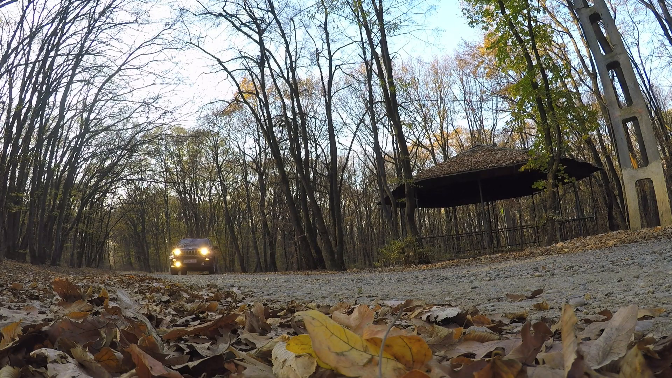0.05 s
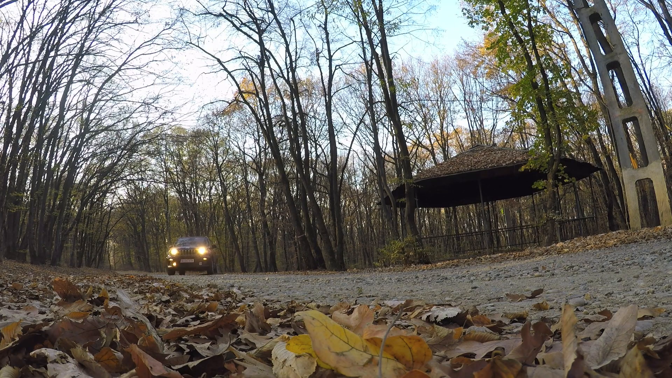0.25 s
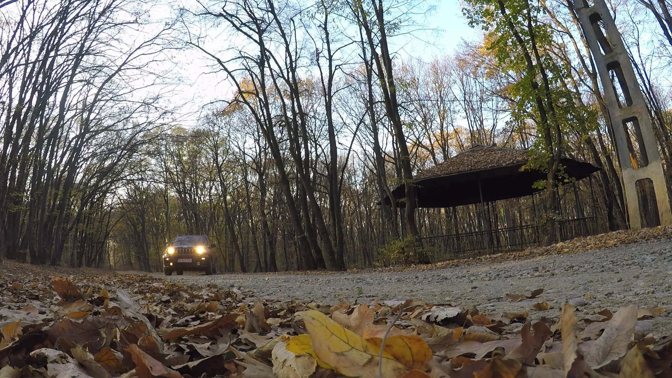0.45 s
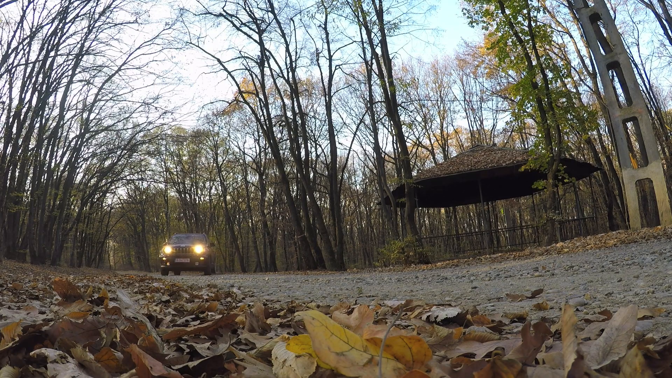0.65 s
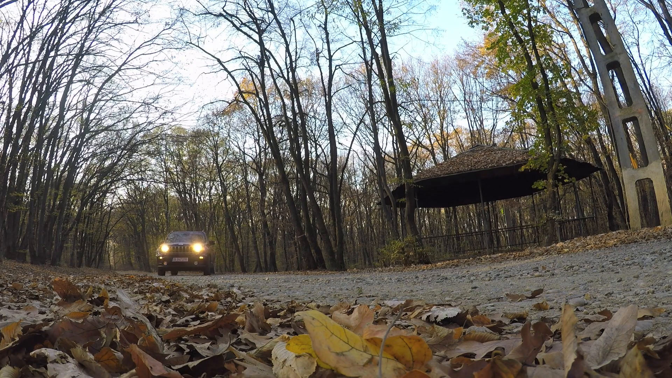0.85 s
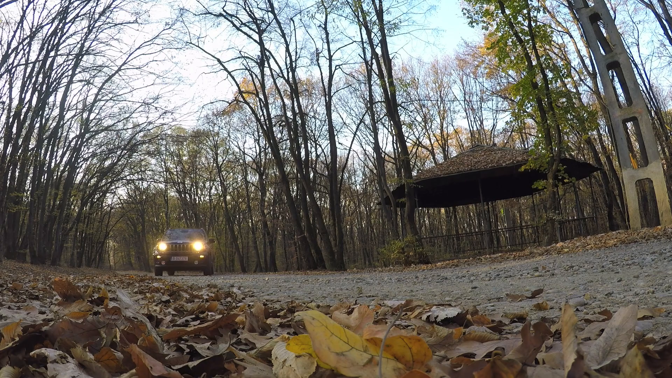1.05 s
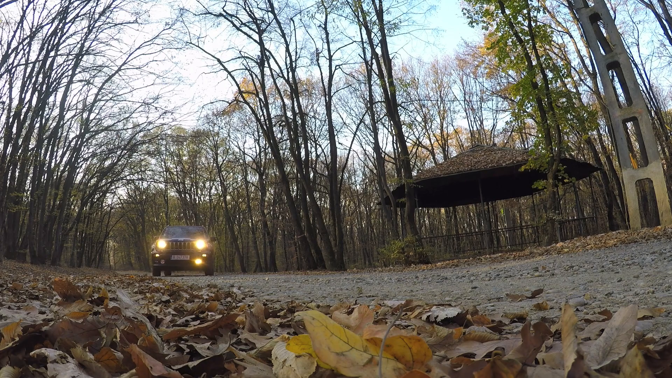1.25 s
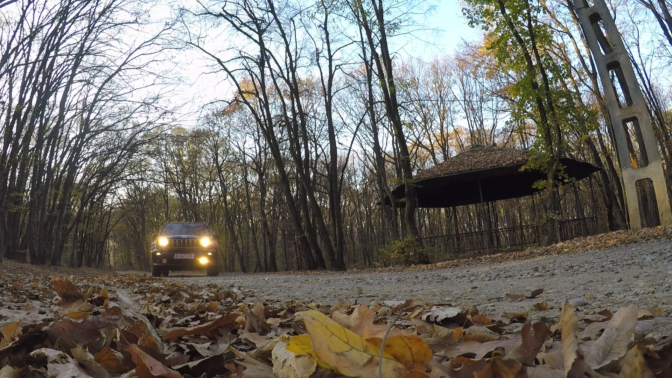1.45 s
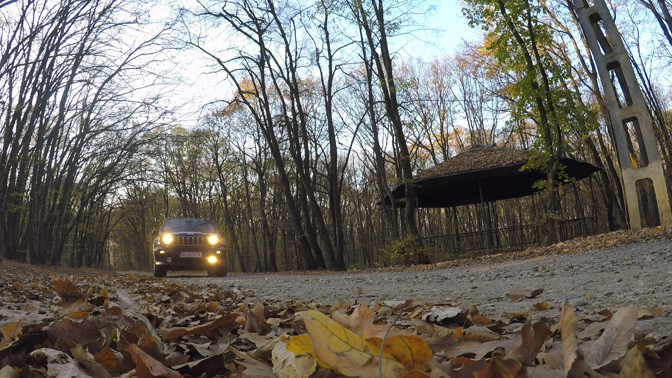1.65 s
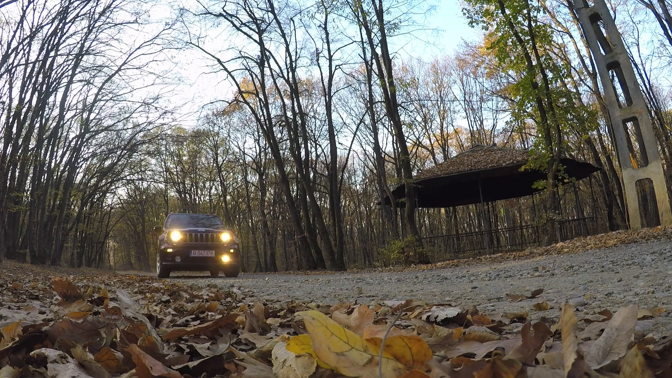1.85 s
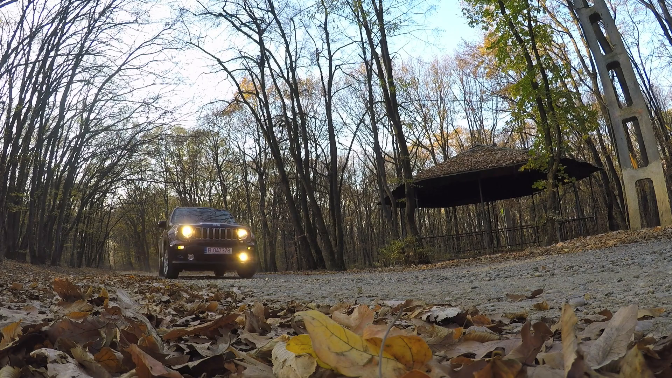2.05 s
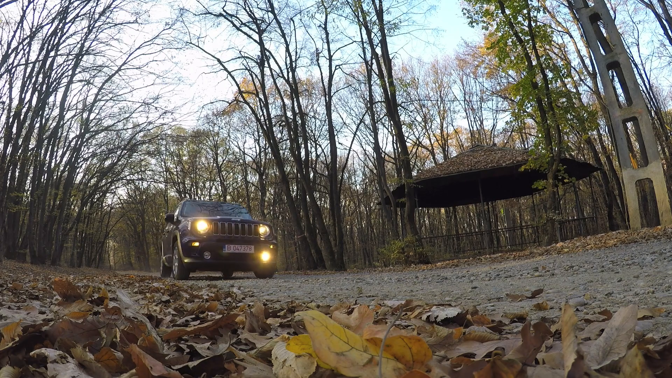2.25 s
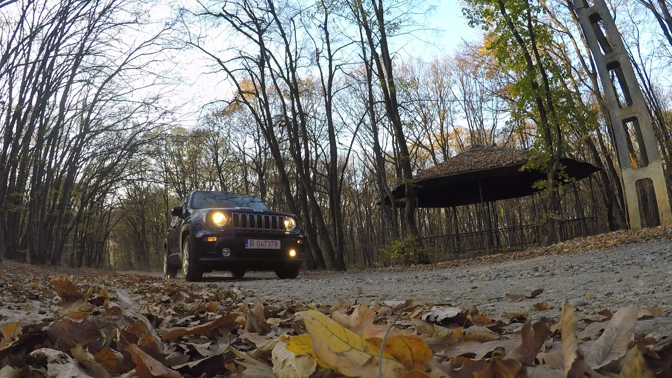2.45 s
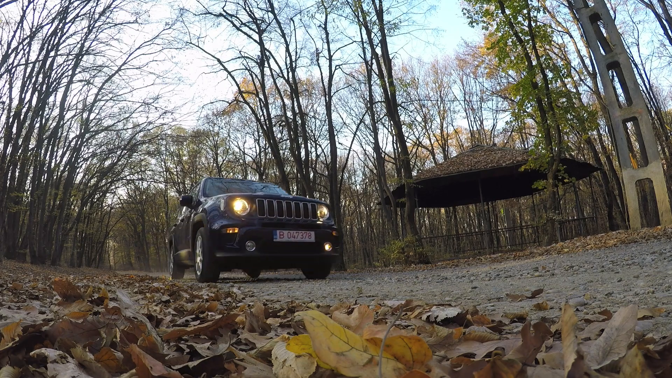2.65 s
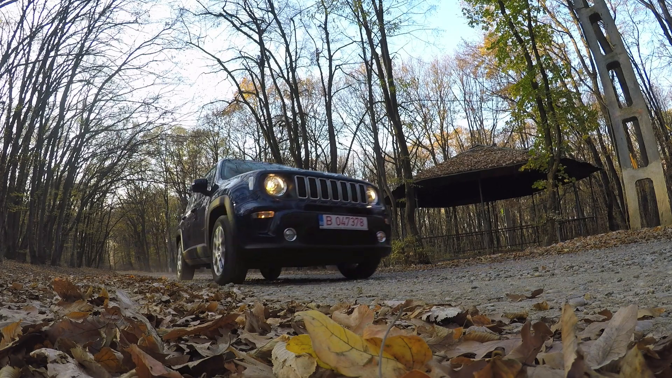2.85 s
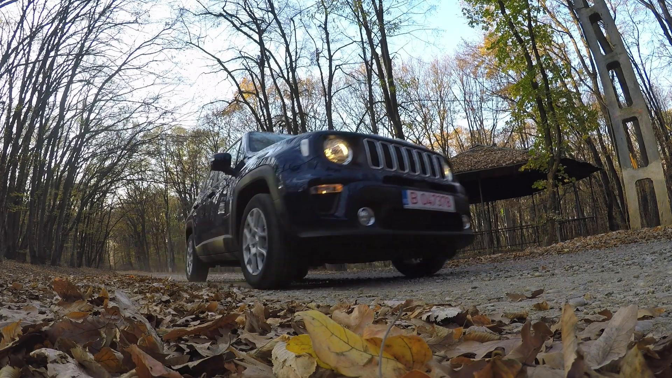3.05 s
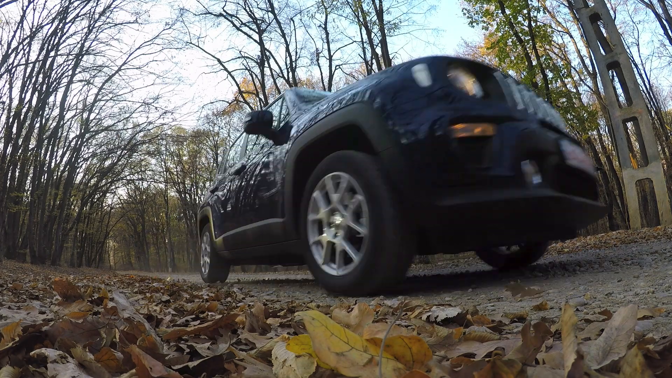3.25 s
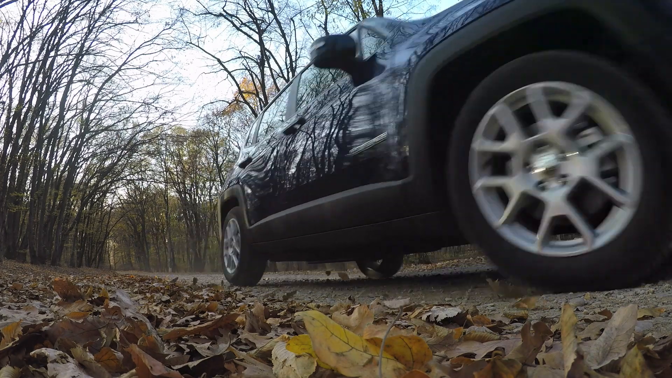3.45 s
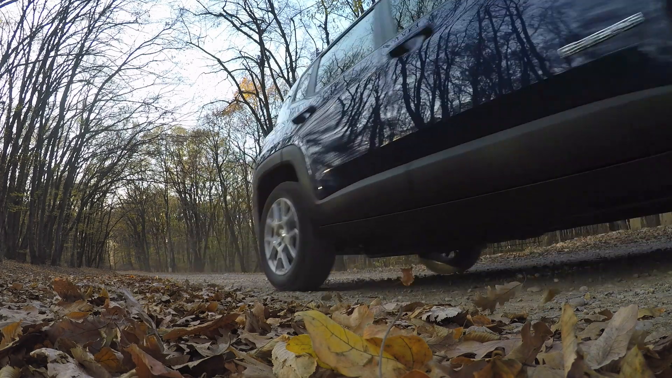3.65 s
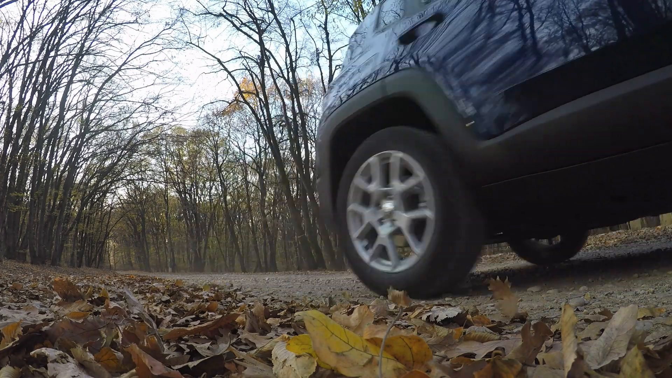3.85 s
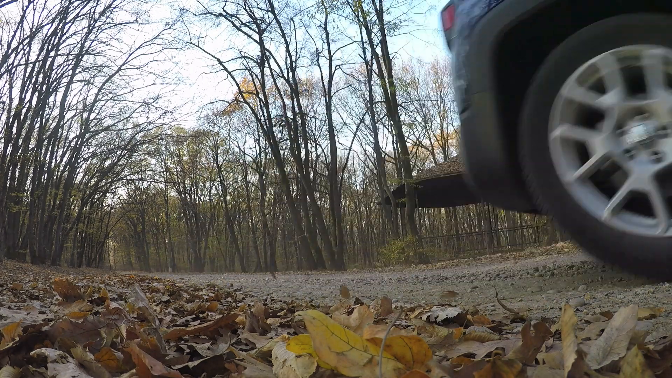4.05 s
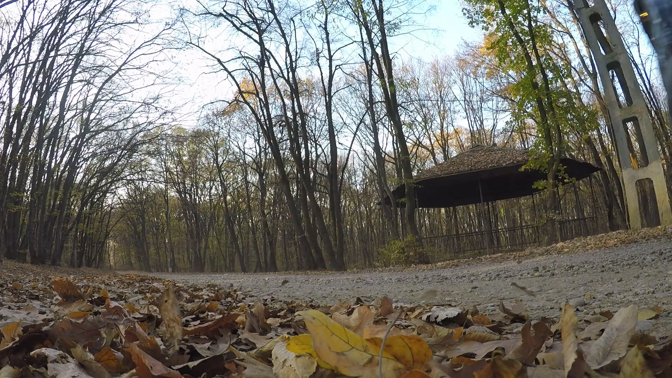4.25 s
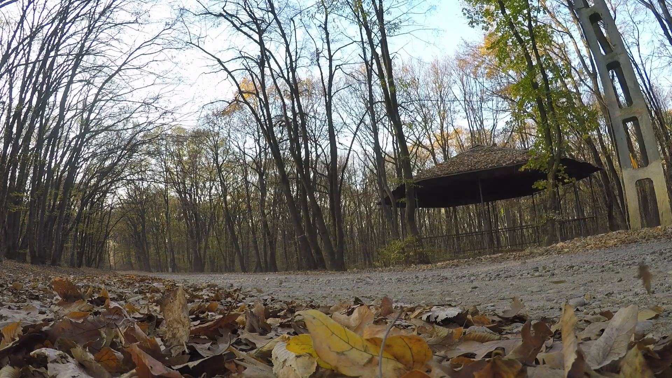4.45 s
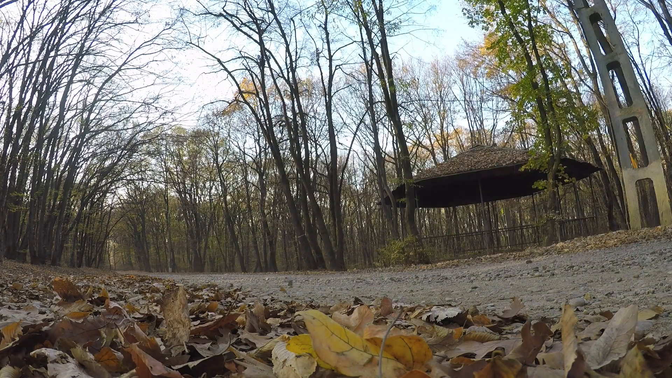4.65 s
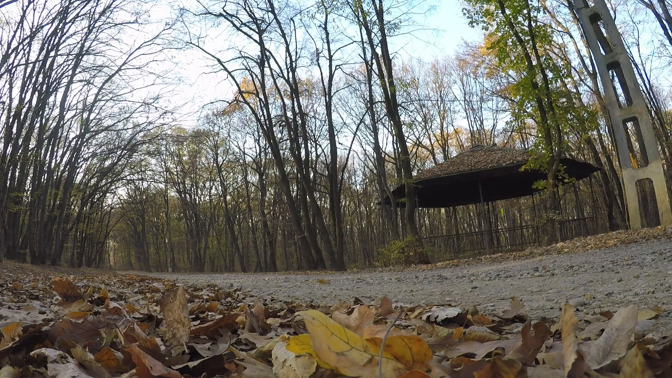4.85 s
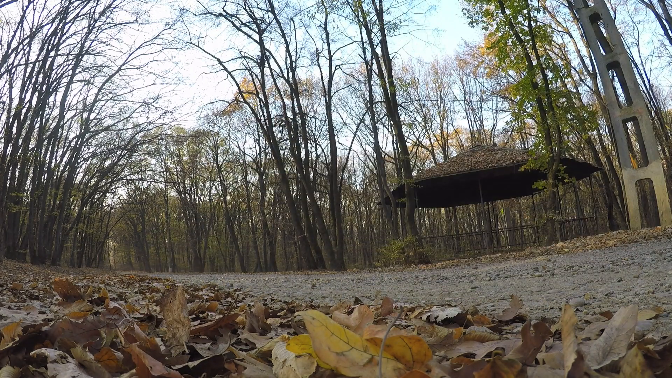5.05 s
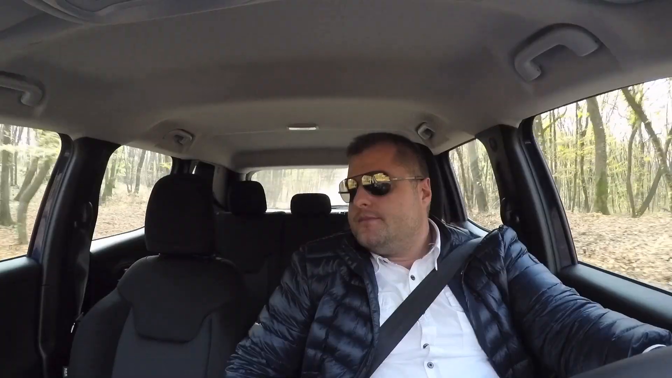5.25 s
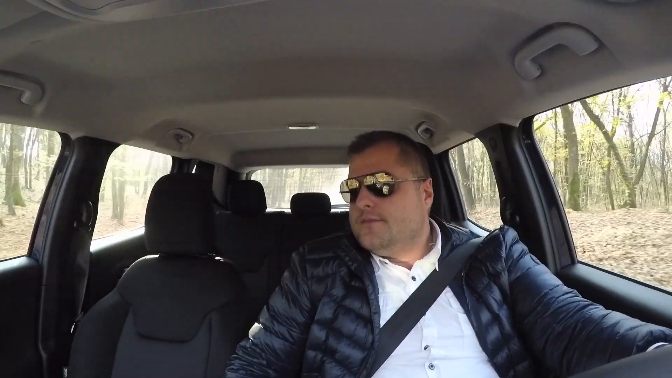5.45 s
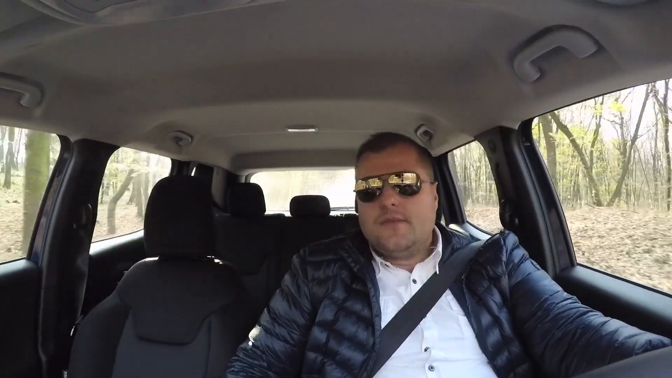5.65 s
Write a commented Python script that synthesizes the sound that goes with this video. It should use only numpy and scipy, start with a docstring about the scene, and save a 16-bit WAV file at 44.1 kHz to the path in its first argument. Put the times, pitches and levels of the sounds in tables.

```python
"""Car passing on gravel

A petrol car rolls up a gravel forest road past a small housed camera lying in leaves. Filtered noise and
random stone slips, attenuated with distance, make the tyres; decaying modes and noise bursts make the
popping stones, thuds and crunches; a gliding harmonic tone makes the exhaust note, sinking as it leaves.
The sound then fades out and returns inside the moving car: body boom, road hum, trim hiss and ticks."""
import sys
import numpy as np
from scipy import signal
from scipy.fft import rfft, irfft
from scipy.io import wavfile
from scipy.ndimage import uniform_filter1d, minimum_filter1d

SR = 44100
rng = np.random.default_rng(int(sys.argv[2]) if len(sys.argv) > 2 else 0)


def wav_out(sig):
    """Save sig, one row per channel (or a flat mono array), as 16-bit PCM at SR to the path in sys.argv[1]."""
    wavfile.write(sys.argv[1], SR, np.round(np.clip(np.atleast_2d(sig).T, -1, 1) * 32767).astype(np.int16))


N = 251811
T = np.arange(N) / SR
ABEAM_S = (3.2, 3.81)  # the view turns from the car's front to its rear
SPEED_M_S, CLOSEST_M, CLOSEST_S = 3.34, 2.146, 3.413  # straight pass: speed, least distance and its time


def undb(db):
    """Amplitude ratio: 20 dB is a factor of ten."""
    return 10 ** (np.asarray(db) / 20)


def unit(x):
    """Normalisation to an rms of 1."""
    return x / np.sqrt(np.mean(x ** 2))


def noise():
    """White noise: equal mean power at every frequency."""
    return rng.standard_normal(N)


def butter(x, order, hz, kind="low"):
    """Butterworth filtering: a maximally flat passband."""
    return signal.sosfilt(signal.butter(order, hz, kind, fs=SR, output="sos"), x)


def colour(x, shape):
    """Minimum-phase filtering to a (Hz, dB) spectrum by the folded cepstrum; rms 1 out."""
    size = 16384
    hz, db = np.transpose(shape)
    f = np.arange(size // 2 + 1) * SR / size + 1e-3
    # octaves beyond the ends of the shape, where the gain falls by a further 40 dB each
    outside = np.maximum(np.log2(hz[0] / f), 0) + np.maximum(np.log2(f / hz[-1]), 0)
    gain_db = np.interp(np.log(f), np.log(hz), db) - 40 * outside
    cepstrum = irfft(np.log(undb(np.maximum(gain_db, -110))))
    cepstrum[1:size // 2] *= 2
    cepstrum[size // 2 + 1:] = 0
    impulse = irfft(np.exp(rfft(cepstrum)))
    return unit(signal.fftconvolve(x, impulse)[:N])


def walk(rate):
    """Slow random modulation: levels held 1 / rate s, slewed twice, with rms 1."""
    hold = int(SR / rate)
    steps = np.repeat(rng.standard_normal(N // hold + 1), hold)
    return unit(uniform_filter1d(uniform_filter1d(steps, hold), hold)[:N])


def ring(seconds, level_db, hz, t60, rise_s, q=0):
    """Exponential decay of struck bodies: a clean mode, or with q a burst of band noise around it."""
    out = np.zeros(N + SR)
    t = np.arange(SR // 8) / SR
    rise = np.sin(np.pi / 2 * np.minimum(t / rise_s, 1)) ** 2
    for s, db, f, decay_s in np.broadcast(seconds, level_db, hz, np.clip(t60, .002, .15)):
        wave = np.sin(2 * np.pi * f * t)
        if q:
            band = signal.iirpeak(f, q, SR)
            once = signal.lfilter(*band, rng.standard_normal(len(t)))
            wave = unit(signal.lfilter(*band, once)) / 2
        i = int(s * SR)
        decay = np.exp(-np.log(1000) * t / decay_s)
        out[i:i + len(t)] += undb(db) * wave * decay * rise
    return out[:N]


def stones(per_s, spread_db, bed_db, looseness):
    """Random impulse process: stones slip with a long tail of sizes, over a bed of tiny slips."""
    chance = rng.random((N, 2)).T
    size_db = np.minimum(-spread_db * np.log(1 - chance[1]), 13)
    sizes = undb(size_db) * rng.choice([-1, 1], N)
    clicks = unit((chance[0] < per_s / SR) * sizes)
    return (clicks + undb(bed_db) * noise()) * looseness


def heard(abeam_db, coming_db, leaving_db, floor_db):
    """Attenuation with distance, down to what the forest scatters back; gives a layer's gain."""
    doublings = np.log2(np.hypot(SPEED_M_S * (T - CLOSEST_S), CLOSEST_M) / CLOSEST_M)
    loss_db = doublings * np.where(T < CLOSEST_S, coming_db, leaving_db)
    return np.hypot(undb(abeam_db - loss_db), undb(floor_db))


# Tyre thudding and roar, from the front and from behind. Each row: frequency in Hz, relative density in dB.
ROAR_FRONT = [(59, -36.5), (100, 1.5), (184, -1.5), (216, -4), (355, -9), (435, -7), (548, -23.5),
              (600, -11), (780, -30)]
ROAR_REAR = [(59, -29.5), (100, 3), (210, -8.5), (232, -9), (279, -6.5), (388, -22.5), (600, -13),
             (780, -29)]


def tyre_roar(patch, behind):
    """Broadband excitation by bumps, plus the cavity resonance of the air ring inside the tyres."""
    bumps = noise() * undb(0.65 * patch + 1.37 * walk(16))
    roar = (1 - behind) * colour(bumps, ROAR_FRONT) + behind * colour(bumps, ROAR_REAR)
    air_hz, width_hz, air_db = 210, 5.4, -7.5
    air = unit(signal.lfilter(*signal.iirpeak(air_hz, air_hz / width_hz, SR), noise()))
    return roar + undb(air_db) * air


# Stones crushed under the tread. Each row: frequency in Hz, relative density in dB.
CRUNCH = [(280, -30), (480, 2.5), (511, 1.5), (560, -15.5), (666, 7.5), (721, 3), (891, 3), (1190, -4),
          (1700, -22.5), (2210, -70.5)]


def stone_crunch(coarse, behind):
    """Spectral filtering along the path: distance takes the top, the view from behind the bottom."""
    crushed = colour(coarse, CRUNCH)
    thin = butter(crushed, 3, 552, "high")
    crushed = np.cos(np.pi / 2 * behind) * crushed + np.sin(np.pi / 2 * behind) * thin
    near = np.interp(T, (1.88, 2.05), (0, 1))
    return near * crushed + (1 - near) * butter(crushed, 4, 1460)


# Remaining tyre layers, lowest first. Each row: frequency in Hz, relative density in dB.
RUMBLE = [(7.1, -25.5), (12, -0.5), (27, 7.5), (55, -6), (72, -45)]
DRONE = [(29, -24), (50, 0.5), (86, 0), (120, -10), (160, -20.5)]
SCRAPE = [(740, -2.5), (1250, 2.5), (2810, -13.5), (3200, -18.5), (4160, -32.5)]
GRIT = [(1710, -29.5), (2900, -13), (3540, -7), (3960, -2), (4420, -3.5), (6160, -13), (7370, -19.5),
        (8580, -15), (11400, -30), (12700, -25.5), (15100, -37)]
# Distance law of rumble, drone, roar, crunch, scrape and grit. Each row: level abeam in dB,
# loss per doubling coming in dB, loss per doubling leaving in dB, far floor in dB.
DISTANCE_LAWS = [(-21.5, 4.5, 3, -53), (-18.5, 5, 11.5, -31), (-18, 4.5, 10, -40), (-21.5, 7, 15, -39.5),
                 (-30.5, 15, 13.5, -49.5), (-41, 11, 18, -62)]
# Bass and crunch start fuller and dip briefly as the car leaves. Each row: time in seconds, added level in dB.
FULLNESS = [(0, 5), (.7, 0), (1.3, 0.7), (4.86, 2), (4.96, -0.5), (5.08, 4.5), (5.25, 0.5)]


def tyres():
    """Common modulation: loose and firm patches of road move crunch, scrape and grit together."""
    rumble, drone, roar, crunch, scrape, grit = (heard(*law) for law in DISTANCE_LAWS)
    fullness = undb(np.interp(T, *np.transpose(FULLNESS)))
    behind = np.interp(T, ABEAM_S, (0, 1))
    patch = 1.33 * walk(25.11)
    # behind the car fewer stones still roll, so the patches stand further apart
    patch = patch * (1 + 0.5 * behind)
    # alongside all four wheels crunch at once, which evens them out
    patch = patch * (1 - 0.2 * np.exp(-((T - CLOSEST_S) / 0.49) ** 2))
    coarse = stones(300, 4.4, -1.5, undb(patch))
    fine = stones(2500, 3.6, 1.4, undb(0.64 * patch + 0.76 * walk(20)))
    low = rumble * colour(noise(), RUMBLE) + drone * colour(noise(), DRONE)
    middle = roar * tyre_roar(patch, behind) + crunch * stone_crunch(coarse, behind)
    high = scrape * colour(1.22 * coarse + fine, SCRAPE) + grit * colour(fine, GRIT)
    return fullness * (low + middle) + high


# Hiss level of the leaves. Each row: time in seconds, mean level in dB.
WAKE = [(0, -60.5), (2, -62), (3.5, -78), (4.3, -58.5), (4.8, -58), (5.25, -58.5)]
# Spectrum of the leaves. Each row: frequency in Hz, relative density in dB.
RUSTLE = [(3820, -2), (6500, -1.5), (7410, -4.5), (8470, -3.5), (9620, -3.5), (12000, -14.5), (15600, -40)]


def leaves():
    """Modulated high-band noise: a thin hiss, strongest in the car's wake."""
    level_db = np.interp(T, *np.transpose(WAKE)) + 1.4 * walk(16)
    return colour(noise(), RUSTLE) * undb(level_db)


# Stones popping out under the tread. Each row: start in seconds, relative level in dB,
# ring frequency in Hz, scrape level relative to the knock in dB.
POPS = [(0.39, -1, 790, -43), (0.531, -25, 800, -40), (0.553, -3.5, 750, -43), (0.599, -6.5, 770, -42),
        (0.608, -10, 825, -41), (0.619, -4, 980, -31), (0.637, -12, 890, -26), (0.726, -12, 750, -36),
        (0.903, -4.5, 815, -54), (0.958, -8.5, 800, -30), (1.521, -10, 830, -39), (1.658, -10.5, 810, -38),
        (1.856, -7.5, 855, -42), (2.052, -5.5, 860, -43), (2.081, -2.5, 850, -44), (2.13, -5, 900, -40),
        (2.27, -7.5, 944, -29), (2.333, -1.5, 880, -24.5), (2.501, 0, 870, -41), (2.602, -3.5, 890, -41),
        (2.708, -7, 880, -28), (2.758, -2, 910, -19.5), (2.889, -2.5, 845, -26), (2.94, -5, 990, -30),
        (3.012, 0.5, 920, -21), (3.225, -5.5, 1070, -31), (3.266, -5, 815, -17), (3.311, 0.5, 785, -33),
        (3.373, 1.5, 950, -13), (3.482, -4, 850, -29), (3.569, -10, 900, -11), (3.721, -4, 850, -28),
        (3.782, -11, 835, -21), (3.798, -4, 764, -11), (3.953, -3.5, 870, -15.5), (4.027, -11, 840, -11),
        (4.106, -3.5, 815, -18), (4.154, -6, 920, -11), (4.202, -9.5, 880, -10.5), (4.231, -1, 830, -32),
        (4.257, -5.5, 820, -19), (4.293, -10, 880, -16), (4.359, -14.5, 1061, -10.5), (4.31, -17, 835, -14),
        (4.405, -6.5, 879, -24), (4.482, -15, 900, -14), (4.632, -30, 1010, -22), (4.648, -10, 901, -17),
        (4.702, -6.5, 860, -18.5), (4.722, -14, 1049, -13), (4.737, -23, 910, -15),
        (4.781, -16.5, 900, -16), (4.816, -17, 1160, -20), (4.826, -10, 966, -21), (4.846, -9, 791, -28),
        (4.859, -17.5, 1024, -11.5), (4.924, -13.5, 904, -35), (4.951, -13, 905, -30),
        (4.992, -13.5, 1050, -15), (5.025, -16, 850, -24), (5.081, -9.5, 775, -31), (5.14, -15, 900, -32),
        (5.162, -11, 785, -40), (5.179, -14.5, 822, -35), (5.249, -14.5, 885, -21), (5.281, -16, 880, -22)]


def pops():
    """Impact and friction: each stone knocks dully, tumbles on briefly and scrapes its neighbours."""
    s, db, hz, scrape_db = np.transpose(POPS)
    tumble_db = db + np.interp(s, ABEAM_S, (-18, -12))  # from the front, from behind
    knock = ring(s - .0006, db + 0.5, hz, 0.011, 0.0013)
    tumble = ring(s + 0.00301, tumble_db, hz, 0.076, 0.0013, q=1.6)
    # the camera housing muffles the knock above its wall resonance
    muffled = butter(knock + tumble, 7, 1500)
    scrape = ring(s, db + scrape_db - 0.5, 1460, 0.058, 0.0024, q=1.56)
    edge = ring(s, db + scrape_db + 1, 1780, 0.011, 0.00098, q=1.0)
    return muffled + scrape + edge


# Tyres on larger stones and hollows. Each row: start in seconds, relative level in dB, carcass mode in Hz.
THUDS = [(0.556, -7.5, 145), (0.724, -12, 155), (0.958, -3, 153), (2.122, -6.5, 182), (2.788, 0, 299),
         (3.374, -4, 133)]


def thuds():
    """Modal ringing: the tyre carcass rings low for a few cycles and shakes the stones around it."""
    s, db, hz = np.transpose(THUDS)
    t60_s = 0.11
    shake = butter(ring(s, db - 4.5, 2.07 * hz, t60_s, 0.0056, q=1.0), 4, 800)
    return ring(s, db - 9.0, hz, t60_s, 0.0015) + shake


# Crunches of grit and dry leaves. Each row: start in seconds, relative level in dB, centre in Hz,
# 60 dB decay time in seconds (held to 0.15 at most).
SNAPS = [(2.307, -32.5, 5300, 0.06), (2.862, -31, 3860, .05), (2.911, -39, 4140, 0.046),
         (2.9751, -30, 4460, 0.045), (3.197, -24.5, 3950, 0.037), (3.259, -31, 4400, 0.045),
         (3.364, -23, 4300, 0.15), (3.373, -23.5, 3900, 0.066), (3.474, -26, 4490, 0.049),
         (3.505, -25, 4100, 0.11), (3.547, -29, 4200, 0.097), (3.578, -29, 3900, 0.064),
         (3.794, -21.5, 3960, 0.048), (3.91, -36, 4420, 0.16), (3.9593, -26, 4470, 0.049),
         (4.025, -37, 4330, 0.096), (4.043, -36, 4400, 0.14), (4.071, -31, 4070, 0.05),
         (4.082, -33, 4190, 0.027), (4.1252, -33, 4270, 0.041), (4.1397, -38, 4530, 0.2),
         (4.1618, -25, 5350, 0.042), (4.2, -39, 3820, .05), (4.2921, -34, 3470, 0.04),
         (4.359, -37, 3170, 0.041), (4.586, -37.5, 3660, 0.06)]


def snaps():
    """Transient fracture noise: each crunch is a sharp burst with a brighter, shorter edge."""
    s, db, hz, t60 = np.transpose(SNAPS)
    body = ring(s, db, hz, t60, 0.0019, q=3.5)
    return body + ring(s, db - 12.5, 1.8 * hz, 0.56 * t60, 0.0028, q=1.9)


# Exhaust note off throttle. Each row: time in seconds, mean firing rate in Hz, mean level in dB.
EXHAUST = [(2.9, 79.66, -25.5), (3.25, 77.52, -18.5), (3.5, 67.57, -13), (3.7, 56.94, -13.5),
           (4.0, 49.96, -12.5), (4.3, 43.23, -12.5), (4.6, 36.38, -16), (4.82, 35.1, -19),
           (4.97, 34.28, -34), (5.15, 34.9, -22.5)]
# Overtones of the note. Each row: multiple of the firing rate, level relative to it in dB.
EXHAUST_OVERTONES = [(2, -12), (3, -28.5)]


def exhaust():
    """Harmonic series on the firing rate, slightly uneven in pitch and strength."""
    s, hz, db = np.transpose(EXHAUST)
    firing_hz = np.interp(T, s, hz) * (1 + 0.0017 * walk(25.5))
    phase = 2 * np.pi * np.cumsum(firing_hz) / SR
    tone = np.sin(phase) + sum(undb(g) * np.sin(k * phase) for k, g in EXHAUST_OVERTONES)
    onset = np.clip((T - s[0] + 0.39) / 0.34, 0, 1)
    return np.sqrt(2) * tone * undb(np.interp(T, s, db) + 0.66 * walk(14)) * onset


def passing_hum():
    """Amplitude envelope on a pure tone: a deep hum swells as the car is alongside."""
    centre_s, half_length_s, hz, level_db = 3.5, 0.38, 43.5, -14
    swell = np.exp(-((T - centre_s) / half_length_s) ** 2)
    return np.sqrt(2) * np.sin(2 * np.pi * hz * T) * undb(level_db) * swell


# Levels inside the car. Each row: time in seconds, boom level in dB, road hum level in dB.
CABIN = [(5.36, -11.5, -23), (5.418, -10, -27), (5.47, -12, -22), (5.5, -13, -25), (5.535, -2.5, -21),
         (5.574, -8, -22.5), (5.595, -15.5, -23.5), (5.66, -3, -24), (5.7, -20, -25)]
# Spectra of body shaking, road hum and trim hiss. Each row: frequency in Hz, relative density in dB.
BOOM = [(12, -7), (30, 0), (55, 1.5), (90, -6.5), (120, -27)]
HUM = [(41, -27), (70, -5), (126, -9.5), (173, -22.5), (206, -12.5), (273, -24), (350, -22.5), (560, -31),
       (760, -39), (1100, -46.5), (2400, -66), (3120, -106)]
TRIM = [(1180, -43), (2000, -6), (5340, -9), (5910, -11.5), (9030, -9.5), (10800, -15), (12600, -11),
        (15100, -25)]


def cabin():
    """Structure-borne sound: the body booms over bumps, the road hums through the floor, trim hisses."""
    s, boom_db, hum_db = np.transpose(CABIN)
    throb_hz, shake_db, trim_db = 21.07, -9, -60  # the body's own bounce; random shaking under it; hiss
    throb = np.sqrt(2) * np.sin(2 * np.pi * throb_hz * T)
    shaking = undb(shake_db) * colour(noise(), BOOM)
    boom = (throb + shaking) * undb(np.interp(T, s, boom_db))
    hum = colour(noise(), HUM) * undb(np.interp(T, s, hum_db))
    trim = colour(stones(1500, 2.5, 5.0, undb(2.0 * walk(39))), TRIM) * undb(trim_db)
    fade = np.interp(T, (5.305, 5.38), (0, 1))
    return (boom + hum) * fade ** 2 + trim * np.sqrt(fade)


# Trim ticking in the cabin. Each row: start in seconds, relative level in dB, centre in Hz.
TICKS = [(5.5935, -39, 11600), (5.6026, -30, 4280)]


def ticks():
    """Impulsive excitation: trim parts tick as very short noise bursts."""
    return ring(*np.transpose(TICKS), 0.012, .0004, q=1.2)


def limit(x, top_db):
    """Peak limiting: the camera turns itself down around its loudest peaks."""
    hold = int(.012 * SR)
    gain = np.minimum(1, undb(top_db) / (abs(x) + 1e-9))
    return x * uniform_filter1d(minimum_filter1d(gain, hold), hold)


def scene():
    """Superposition of the sources, first outside the car and then inside it."""
    outside = tyres() + leaves() + pops() + thuds() + snaps() + exhaust() + passing_hum()
    outside = limit(outside, -1.5) * np.interp(T, (5.193, 5.305), (1, 0))
    inside = limit(cabin(), .7) + ticks()
    return (outside + inside)[None]


def record(dry):
    """Saturation and band limiting: the recorder rounds the loudest peaks and cuts the top."""
    rounded = np.tanh(.6 * dry) / .6
    return signal.sosfilt(signal.ellip(10, .2, 70, 15200, fs=SR, output="sos"), rounded)


dry = scene()
out = record(dry)
wav_out(out)
```